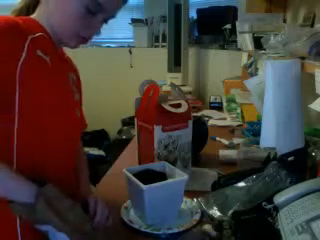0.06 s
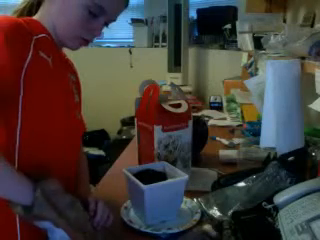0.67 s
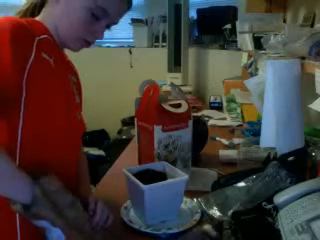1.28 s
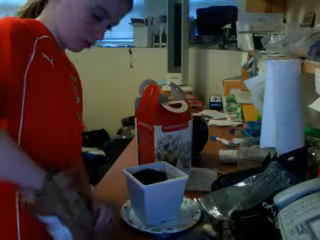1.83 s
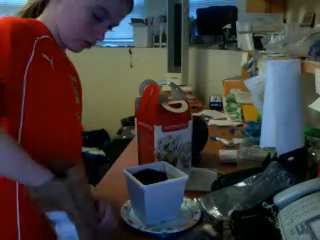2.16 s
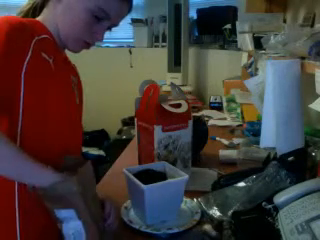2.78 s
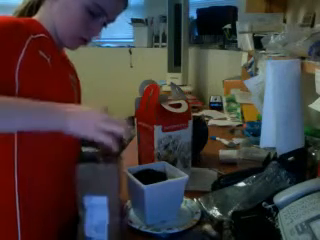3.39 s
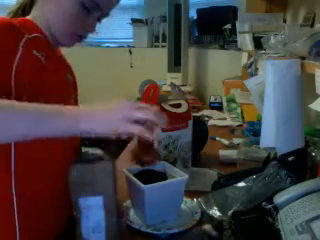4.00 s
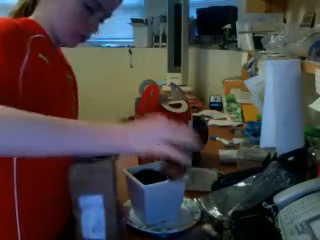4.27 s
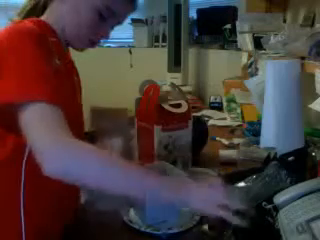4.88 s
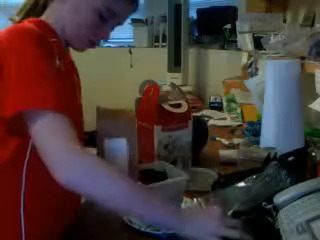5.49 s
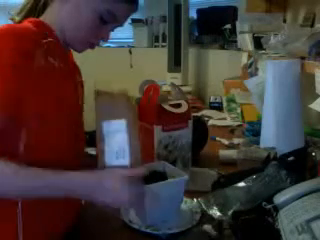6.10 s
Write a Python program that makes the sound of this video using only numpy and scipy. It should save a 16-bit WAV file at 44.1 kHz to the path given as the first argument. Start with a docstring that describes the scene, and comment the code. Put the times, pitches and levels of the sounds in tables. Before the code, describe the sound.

A hand rummages in a stiff paper bag at a kitchen counter, close to a small microphone. From the start the paper slides and crinkles in uneven strokes, and its creases snap sharply, loudest at about 1 second. The sound is slightly boxy, with a short room echo. The rustling goes on through the next two seconds, joined by soft, dull bumps against the counter around 2 and 3 seconds. From about 3 to 3.9 seconds a small hollow container scrapes lightly out of the bag while the crackles thin out. After that it is much quieter: faint paper ticks come near 4.1 and 4.5 seconds, a soft double knock at 5.5 seconds, and a last brief rustle just after 6 seconds. A faint, steady room hum and microphone hiss lie underneath throughout.

```python
"""A kitchen counter, close to a small microphone: a hand digs inside a stiff paper bag.
Creases snap through and ring the panels; paper slides and crinkles. Low-mid resonances colour both.
A small hollow container scrapes out, with soft bumps against the counter.
A few faint taps and a last rustle follow, over room hum and microphone hiss."""
import sys
import numpy as np
from scipy import signal
from scipy.fft import rfft, irfft
from scipy.io import wavfile

SR = 44100
rng = np.random.default_rng(int(sys.argv[2]) if len(sys.argv) > 2 else 0)


def transcribe(u):
    """Save the signal u as a 16-bit wav file named by the first command-line argument.

    u: samples, shape (n,) or (channels, n), limited to [-1, 1]; the rate is SR.
    q: integer samples, one column per channel.
    """
    v = np.clip(np.atleast_2d(u).T, -1, 1)
    q = np.round(v * 32767).astype(np.int16)
    wavfile.write(sys.argv[1], SR, q)


N = 274302
TIME = np.arange(N) / SR
ROOM_T60_S = 0.27

# crease snaps and light taps: (t/s, level/dB, panel f/Hz, crack trim/dB, edge trim/dB)
SNAP_HITS = [(0.175, -17, 1430, -17, -44), (0.411, -27, 583, -13.5, -27), (0.427, -17, 880, -11.5, -13.5),
             (0.492, -27.5, 835, -14.5, -15), (0.515, -22.5, 850, -10.5, -14.5),
             (0.614, -32, 1070, -1, -18), (0.64, -15.5, 2120, -5.5, -6.5), (0.915, -25, 910, -11.5, -40),
             (0.971, -21, 2250, -16.5, -16), (0.978, -17, 645, -13, -9.5), (1.028, -11.5, 584, -6, -5),
             (1.211, -30, 556, -32, -34), (1.321, -22.5, 1590, -10, -32), (1.461, -35, 2830, -9.5, -20),
             (1.523, -23, 1430, -22, -18), (1.547, -25.5, 644, -23, -24), (1.649, -19.5, 616, -4.5, -8.5),
             (1.82, -30, 513, -13, -38), (1.964, -31.5, 586, -14, -17), (2.294, -18.5, 1080, -8.5, -21),
             (2.392, -20.5, 1320, -9.5, -16), (2.456, -32, 1460, -3.5, -13.5), (2.507, -32, 550, -25, -25),
             (2.549, -25.5, 410, -42, -31), (2.67, -20, 930, -10, -14.5), (2.884, -28, 547, -22, -27),
             (2.92, -32.5, 2260, -7, -5.5), (2.935, -26.5, 620, -9, -33), (3.001, -30, 1080, -22, -26),
             (3.032, -26.5, 950, -8.5, -34), (3.189, -29, 2000, -9.5, -21), (3.221, -29, 2970, -12, -12),
             (3.312, -34.5, 1900, -7, -15), (3.559, -30.5, 1660, -10.5, -8.5),
             (3.617, -30, 4150, -11.5, -9), (3.717, -39, 3400, -12.5, -11), (3.75, -32, 1970, -16.5, -9),
             (3.846, -41, 1185, -15.5, -19), (4.12, -42.5, 1010, -10.5, -12),
             (4.478, -45.5, 1510, -14, -20), (6.014, -55.5, 480, -5, 4.5), (6.149, -42, 1260, -11, -2)]
# EQ curves for the mid crack, bright paper hiss, panel body and low air thump: (f/Hz, level/dB)
CRACK_EQ = [(800, -13), (1600, 2.5), (2400, 3), (3800, 3), (4600, 0), (5500, -21.5)]
HISS_EQ = [(2500, -21.5), (4200, 0), (5500, 0), (7000, -2), (9000, -5.5), (10700, -14)]
PANEL_EQ = [(200, -17), (380, -2.5), (600, 5.5), (760, 0.5), (950, 2.5), (1500, 6), (2200, -9),
            (4000, -46.5)]
THUMP_EQ = [(40, -8), (110, -6), (210, 6), (290, -2.5), (380, 0.5), (700, -26.5)]
# thump under snaps and strokes, strongest as the bag is lifted and emptied: (t/s, relative level/dB)
THUMP_RIDE = [(0.4, -35.5), (1.05, -28.5), (1.8, -30.5), (2.3, -15), (2.7, -23.5), (3.05, -18), (3.6, -16),
              (3.85, -28)]
def snaps(lead_s=.02, creak_db=-11, creak_s=0.0052, panel_db=-15, ring_db=-20, ring_q=3.44):
    """Each crease creaks under strain, then cracks; its panel rings and pushes air out of the bag."""
    out = np.zeros(N + SR)
    t = np.arange(SR // 4) / SR - lead_s
    for at_s, db, hz, crack_db, edge_db in SNAP_HITS:
        creak = undb(creak_db) * rng.standard_normal(len(t)) * np.exp(-abs(t) / creak_s) * (t < 0)
        # a blunt fold gives way more slowly, which pitches its whole crack down
        speed = 2 ** np.clip((edge_db - crack_db + 6) / 36, -.6, 0)
        transient = buckle(t, hold_s=0.0014, fall_s=0.0047, rise_s=0.00022) + creak / 2
        crack = undb(crack_db) * colour(transient, np.multiply(CRACK_EQ, [speed, 1]))
        edge = undb(edge_db) * colour(buckle(t, hold_s=0.0028, fall_s=0.014) + creak, HISS_EQ)
        # larger, lower panels push more air: 1.5 dB per octave
        thump_db = np.interp(at_s, *np.transpose(THUMP_RIDE)) - 1.5 * np.log2(hz / 1000)
        thump = undb(thump_db) * colour(buckle(t, hold_s=0.0017, fall_s=0.013), THUMP_EQ)
        push = buckle(t, hold_s=0.0018, fall_s=0.0051, wet_db=-11) + creak / 2
        # small, high panels ring at a level that follows the crack
        tone_db = np.interp(hz, [1000, 1600], [ring_db, crack_db + 3])
        tone = ring_twice(push, hz, hz / ring_q) * np.sqrt(2 * SR * ring_q / (np.pi * hz))
        panel = undb(panel_db) * colour(push, PANEL_EQ) + undb(tone_db) * tone
        start = max(int((at_s + .0005 - lead_s) * SR), 0)
        out[start:start + len(t)] += undb(db) * (crack + edge + thump + panel)
    return out[:N]


def buckle(t, hold_s, fall_s, wet_db=-10, rise_s=0.00046):
    """A crease gives way in a quick run of slips with a diffuse room tail, at constant total energy."""
    after = np.maximum(t, 0)
    attack = 1 - np.exp(-after / rise_s)
    direct = np.exp(-np.maximum(t - hold_s, 0) / fall_s)
    tail = undb(wet_db) * np.exp(-np.log(1000) * after / ROOM_T60_S)
    run = rng.choice([-1, 1], len(t)) * np.hypot(direct, tail) * attack
    return run / np.linalg.norm(run) * np.sqrt(0.015 * SR)


# EQ curve of paper sliding on paper: (f/Hz, level/dB)
SLIDE_EQ = [(200, -26), (350, -14), (550, -0.5), (760, -5.5), (1100, 0), (2000, 2), (3500, -0.5),
            (4800, -14), (7000, -30)]
def rustle():
    """Sliding paper: a fine rub with crinkles in it, catching and letting go, while the walls flex."""
    rub_env, hiss_env = strokes()
    grip = undb(2 * walk(rate=60))
    slips = grains(N, rate=6500, spread_db=1.5) * grip
    fibres = grains(N, rate=6000, spread_db=4) * grip
    rub = undb(-0.5) * colour(slips * rub_env, SLIDE_EQ)
    hiss = undb(1.5) * colour(fibres * hiss_env, HISS_EQ)
    thump_env = rub_env * undb(np.interp(TIME, *np.transpose(THUMP_RIDE)))
    flexing = undb(3) * colour(rng.standard_normal(N) * thump_env, THUMP_EQ)
    return rub + hiss + undb(-8) * crinkles() * rub_env + flexing


# strokes of the hand over the paper: (t/s, hold/s, level/dB, hiss trim/dB)
HAND_STROKES = [(0, .04, -57, 0.5), (0.141, 0.045, -54, 2), (0.267, 0.014, -49, 4), (0.432, 0.07, -51, -3),
                (0.51, .02, -42.5, -2.5), (0.637, .015, -39.5, -3.5), (0.756, 0.044, -44.5, 0),
                (0.904, 0.16, -48, -3), (1.236, 0.072, -48, -5), (1.298, 0.022, -44, -3),
                (1.391, 0.027, -41, -5), (1.501, 0.058, -45, -4), (1.667, 0.045, -40, -5),
                (1.797, .19, -47, -1), (2.081, 0.012, -49.5, -0.5), (2.191, 0.085, -52, 0),
                (2.393, 0.0091, -52, 6.5), (2.464, 0.034, -46.5, -5), (2.658, 0.053, -45.5, -2.5),
                (2.802, 0.081, -52, -3), (2.886, .11, -48, 2), (3.01, 0.075, -40.5, -1.5),
                (3.213, .11, -44, -2.5), (3.345, .15, -48, -6.5), (3.527, 0.079, -49.5, -2),
                (3.65, 0.082, -56, -1), (4.495, 0.03, -63.5, -1), (6.107, .01, -68, 7),
                (6.173, .015, -50, -6.5), (6.208, .01, -51.5, 2)]
def strokes(attack_s=0.03, release_s=0.046):
    """Envelopes for rub and hiss: each stroke swells, holds and dies away; overlaps add in power."""
    rub_power, hiss_power = np.zeros((2, N))
    for at_s, hold_s, db, hiss_db in HAND_STROKES:
        early, late = np.maximum(at_s - TIME, 0), np.maximum(TIME - at_s - hold_s, 0)
        press = undb(db) * np.exp(-np.minimum(early / attack_s + late / release_s, 20))
        rub_power += press ** 2
        hiss_power += (press * undb(hiss_db)) ** 2
    return np.sqrt(rub_power), np.sqrt(hiss_power)


def crinkles(q=3):
    """Small wrinkles flick over at random, each ringing briefly at the pitch of its patch of paper."""
    out = np.zeros(N)
    for hz in np.geomspace(550, 4200, num=6):
        flicks = grains(N, rate=16, spread_db=5)
        out += unit(ring_twice(flicks, hz, hz / q)) * np.sqrt(hz)
    return unit(out)


# fader ride of the container scraping out of the bag: (t/s, level/dB)
SCRAPE_RIDE = [(3.1, -58), (3.3, -60), (3.58, -55), (3.78, -56.5), (3.9, -87)]
def scrape(hollow_hz=1900, width_hz=380):
    """Paper catching and dragging over the container excites its hollow."""
    drag = grains(N, rate=830, spread_db=6) * undb(2.5 * walk(rate=35))
    level_db = np.interp(TIME, *np.transpose(SCRAPE_RIDE), left=-120, right=-120)
    return unit(ring_twice(drag, hollow_hz, width_hz)) * undb(level_db)


# soft bumps against the counter: (t/s, level/dB, f/Hz)
COUNTER_BUMPS = [(2.074, -49.5, 180), (2.125, -51.5, 134), (2.938, -45, 165), (3.194, -47, 130),
                 (3.323, -46, 176), (5.512, -44.5, 151.5), (5.535, -47, 165)]
def bumps(rise_s=0.0015, fall_s=0.008):
    """Padded knocks: a few dull, damped cycles each."""
    out = np.zeros(N)
    for at_s, db, hz in COUNTER_BUMPS:
        t = np.maximum(TIME - at_s, 0)
        envelope = (1 - np.exp(-t / rise_s)) * np.exp(-np.minimum(t / fall_s, 50))
        out += 2 * undb(db) * np.sin(2 * np.pi * hz * t) * envelope
    return out


# low-mid resonances, probably of the room and counter: (f/Hz, width/Hz, relative level/dB)
ROOM_MODES = [(377.5, 44, 1.5), (466, 35, -3), (525, 35, 1), (650, 200, -1), (898, 230, -1)]
def room_resonance(paper, direct_db=-5, modes_db=-3):
    """Static low-mid resonances, probably of the room and counter, colour the snaps and rustle."""
    modes = sum(undb(db) * ring(paper, hz, width_hz) for hz, width_hz, db in ROOM_MODES)
    return undb(direct_db) * paper + undb(modes_db) * modes


def kitchen(x, wet_db=-6, early_db=-9, early_s=0.0033):
    """Counter and clutter scatter the sound at once; the walls add a short tail."""
    t = np.arange(SR // 4) / SR
    hop = SR // 12
    fade = np.sin(np.linspace(0, np.pi, 2 * hop))
    source = np.pad(x, (hop, SR))
    out = source.copy()
    for start in range(0, N + hop, hop):  # fresh reflections each hop: paths change as the bag moves
        early = grains(len(t), rate=3400, spread_db=1) * np.exp(-t / early_s)
        tail = rng.standard_normal(len(t)) * np.exp(-np.log(1000) * t / ROOM_T60_S)
        response = undb(early_db) * early / np.linalg.norm(early)
        response += undb(wet_db) * tail / np.linalg.norm(tail)
        echo = signal.fftconvolve(source[start:start + 2 * hop] * fade, response)
        out[start:start + len(echo)] += echo
    return out[hop:hop + N]


# EQ curve of low room noise and microphone hiss: (f/Hz, level/dB)
ROOM_TONE_EQ = [(15, -45), (25, -9), (84, -15), (120, -7.5), (251, -17), (485, -16), (786, -20.5),
                (1090, -23.5), (1180, -23), (10700, -26.5), (13900, -54), (22000, -120)]
def room_tone(noise_db=-63, hum_db=-76, hum_hz=119):
    """A bed of microphone hiss, low room noise and a wavering appliance hum."""
    wavering_hz = hum_hz + 2 * walk(rate=15)
    hum = np.sqrt(2) * np.sin(2 * np.pi * np.cumsum(wavering_hz) / SR)
    noise = unit(colour(rng.standard_normal(N), ROOM_TONE_EQ))
    return undb(noise_db) * noise + undb(hum_db) * hum


def grains(count, rate, spread_db):
    """Tiny random clicks, about `rate` a second: many weak, a few strong."""
    chance, strength, side = rng.random((3, count))
    hit = chance < rate / SR
    level_db = spread_db * np.minimum(-np.log1p(-strength[hit]), 4)
    out = np.zeros(count)
    out[hit] = np.sign(side[hit] - .5) * undb(level_db)
    return unit(out)


def walk(rate):
    """Random drift through `rate` points a second, with a spread near 1."""
    knots = rng.standard_normal(2048)
    return 1.2 * np.interp(TIME * rate, np.arange(len(knots)), knots)


def colour(x, curve):
    """Causal EQ, falling 12 dB per octave beyond the curve's ends; white input keeps its power."""
    hz, db = np.transpose(curve)
    f = np.maximum(np.fft.rfftfreq(2048, 1 / SR), 1)
    octaves_outside = np.maximum(np.log2(hz[0] / f), 0) + np.maximum(np.log2(f / hz[-1]), 0)
    gain = undb(np.interp(np.log(f), np.log(hz), db) - 12 * octaves_outside)
    cepstrum = irfft(np.log(gain))
    cepstrum[1:1024] *= 2  # fold to minimum phase, so attacks stay crisp
    cepstrum[1025:] = 0
    response = irfft(np.exp(rfft(cepstrum)))
    return signal.fftconvolve(x, response / np.linalg.norm(response))[:len(x)]


def ring(x, hz, width_hz):
    """One resonance, gain 1 at its centre."""
    return signal.lfilter(*signal.iirpeak(hz, hz / width_hz, fs=SR), x)


def ring_twice(x, hz, width_hz):
    """Two resonances in series, for steeper skirts."""
    return ring(ring(x, hz, width_hz), hz, width_hz)


def undb(db):
    """Decibels to gain."""
    return 10 ** (np.asarray(db) / 20)


def unit(x):
    """Scale to rms 1."""
    return x / np.sqrt(np.mean(x ** 2) + 1e-20)


def scene():
    """Mono mix: snaps carry their own room tail; the other handling goes through the kitchen reverb."""
    creases = room_resonance(snaps())
    handling = room_resonance(rustle()) + scrape() + bumps()
    return (creases + kitchen(handling) + room_tone())[None]


def record(dry):
    """The converter dulls the highest treble, and the top is cut steeply."""
    converter_hz, top_hz = 10750, 12300
    dulled = signal.sosfilt(signal.ellip(6, .3, 11, converter_hz, fs=SR, output="sos"), dry)
    return signal.sosfilt(signal.ellip(10, .2, 70, top_hz, fs=SR, output="sos"), dulled)


dry = scene()
out = record(dry)
transcribe(out)
```